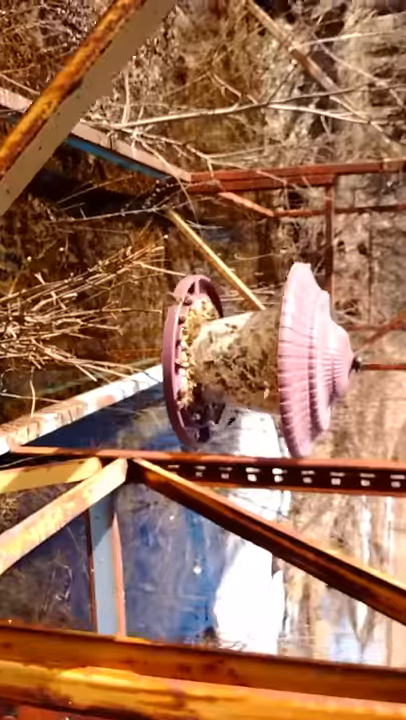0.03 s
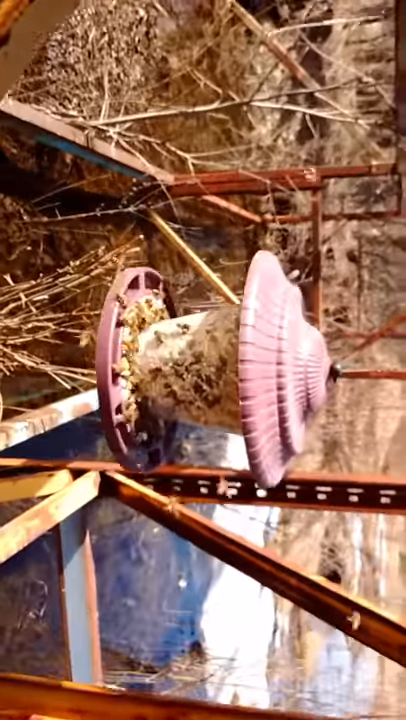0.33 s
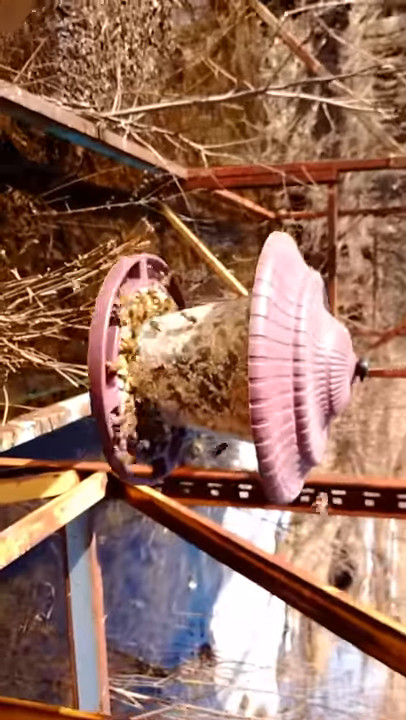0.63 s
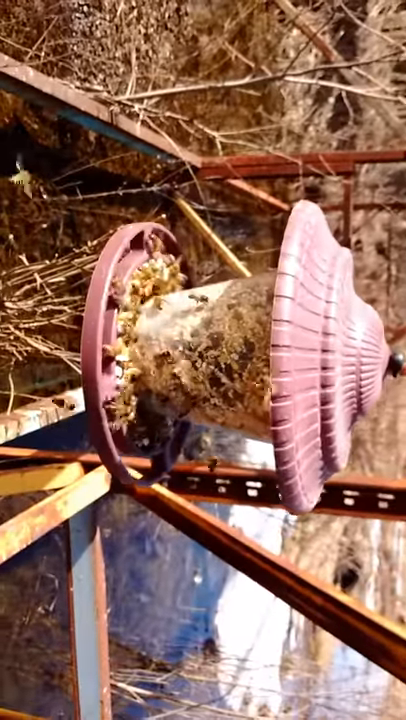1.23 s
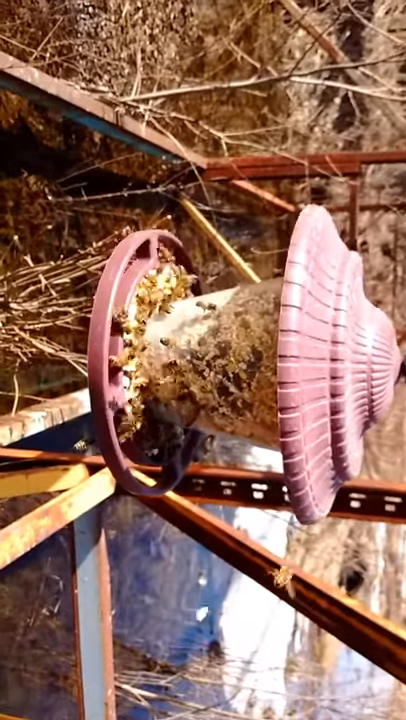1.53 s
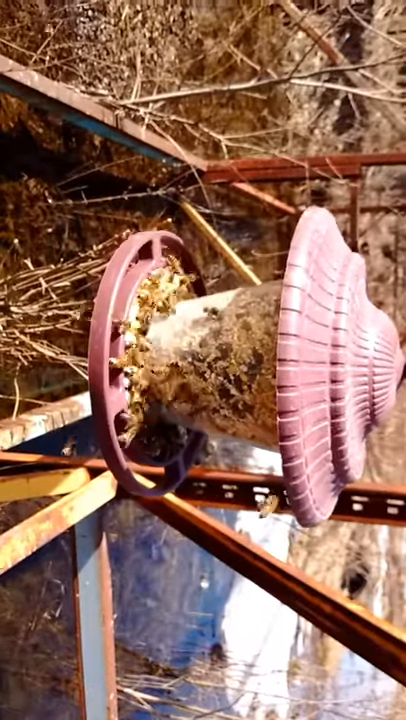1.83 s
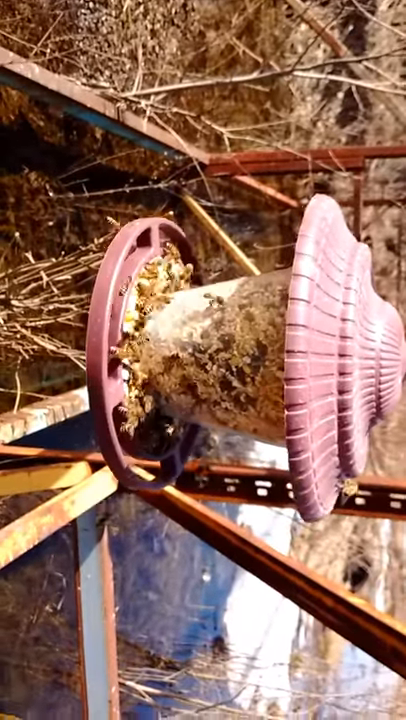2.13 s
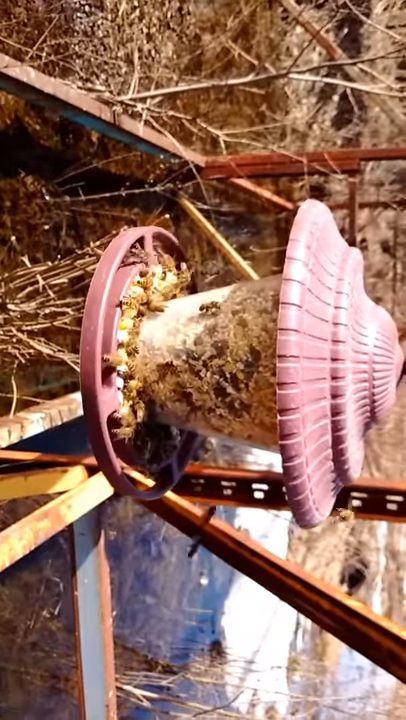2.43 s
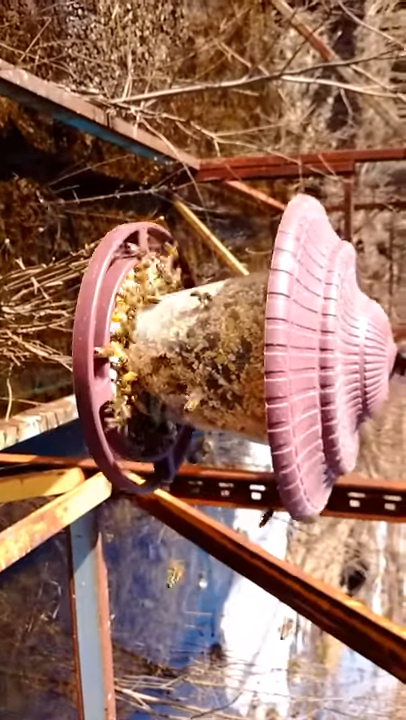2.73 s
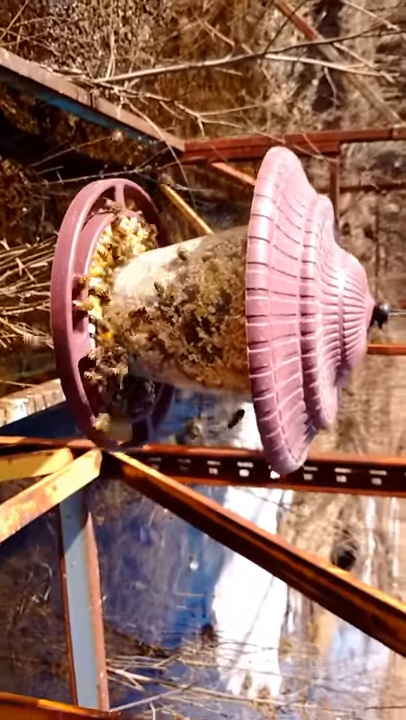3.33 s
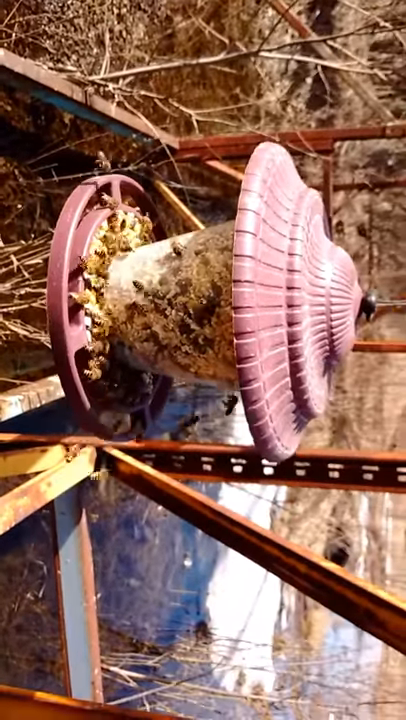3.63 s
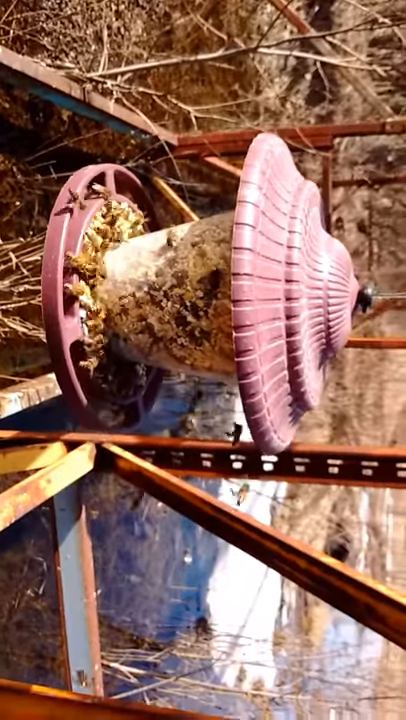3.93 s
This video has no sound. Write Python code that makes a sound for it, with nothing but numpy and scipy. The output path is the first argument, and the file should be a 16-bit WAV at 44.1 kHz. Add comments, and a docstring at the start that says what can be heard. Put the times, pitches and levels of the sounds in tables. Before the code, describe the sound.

A swarm of bees hums steadily in hissing outdoor air, and several fly right by the microphone. Handling adds short rustles and a few sharp clicks, the loudest briefly turning the buzzing down.

```python
"""Honeybees swarm round a hanging feeder outdoors, their wingbeats buzzing over a steady hiss. Five of them fly
close past the microphone. Handling makes soft rustles, bees strike the recorder in sharp ticks that ring its
casing, and puffs of air bump the microphone openings. After each loud tick the recorder's gain control turns
everything down, then creeps back up. The stereo is very wide: in the bass, left and right move nearly opposite
ways."""
import sys
import numpy as np
from scipy import signal
from scipy.fft import rfft, irfft, next_fast_len
from scipy.io import wavfile

SR = 44100
rng = np.random.default_rng(int(sys.argv[2]) if len(sys.argv) > 2 else 0)


def transcribe(u):
    """Save the signal u as a 16-bit wav file named by the first command-line argument.

    u: samples, shape (n,) or (channels, n), limited to [-1, 1]; the rate is SR.
    q: integer samples, one column per channel.
    """
    v = np.clip(np.atleast_2d(u).T, -1, 1)
    q = np.round(v * 32767).astype(np.int16)
    wavfile.write(sys.argv[1], SR, q)


N = 176400
TIME = np.arange(N) / SR
WINGBEAT_HZ, FLUTTER_PER_S = 236.84, 25
RUSTLE_ATTACK_S = 0.0009

# A "pair" is two signals: mid (what left and right share) and side (how they differ).
# how strongly the microphones pick up the mid and the side: f/Hz, gain/dB
MID_RESPONSE = [(100, -13), (480, -11), (720, -8.5), (1200, 1), (1600, 3.5), (2200, -3.5), (3200, -13),
                (4000, -6.5), (4800, -3.5), (5700, -6.5), (6400, -28), (7000, -5.5), (7800, -1), (9500, -7),
                (12000, 3.5), (14000, -8), (15300, -3)]
SIDE_RESPONSE = [(100, 10.5), (480, 7), (720, 2.5), (1200, -0.5), (1550, -8.5), (2000, -4.5), (2800, 3),
                 (3400, -3), (4000, -2), (4700, -33), (5500, -1.5), (6800, -9.5), (8000, -4), (9500, -11),
                 (11000, 7), (12500, -18), (14200, 5), (15300, -29)]
# tone of the grainy noise in rustles and tick tails: f/Hz, level/dB
GRAIN_SPECTRUM = [(200, -16), (600, -3), (1200, -9.5), (2500, 5), (5000, 0), (7500, 6), (11000, -3.5),
                  (15000, -4)]


def from_db(db):
    """Turn decibels into a factor to multiply by."""
    return 10 ** (np.asarray(db) / 20)


def unit_power(x):
    """Scale a signal so that its average power is 1."""
    return x / np.sqrt(np.mean(x ** 2) + 1e-20)


def db_at(spectrum, hz):
    """Read a level between the points of a spectrum, with octaves evenly spaced."""
    f, db = np.transpose(spectrum)
    return np.interp(np.log(np.maximum(hz, 1)), np.log(f), db)


def colour(x, spectrum, share=1):
    """Filter a sound to follow a spectrum; share scales the spectrum's decibels."""
    size = 2 * next_fast_len(N // 2 + SR // 10)
    hz = np.arange(size // 2 + 1) * SR / size
    cepstrum = irfft(np.log(from_db(share * db_at(spectrum, hz))))
    # minimum phase: the filter rings after a sound, never before it
    cepstrum[1:size // 2] *= 2
    cepstrum[size // 2 + 1:] = 0
    return irfft(rfft(x, size) * np.exp(rfft(cepstrum)))[..., :N]


def drift(per_s):
    """A smooth random wobble of typical size 1; a higher rate makes it quicker."""
    step, run_in = 20, 4000
    pole = np.exp(-2 * np.pi * step * per_s / SR)
    noise = rng.standard_normal(N // step + run_in + 2)
    slow = signal.lfilter([1], [1, -2 * pole, pole * pole], noise)[run_in:]
    return np.interp(np.arange(N) / step, np.arange(len(slow)), unit_power(slow))


def strike(start_s, attack_s, t60):
    """A loudness curve that rises quickly, then fades by 60 dB in t60 seconds."""
    age = np.maximum(TIME - start_s, 0)
    return (1 - np.exp(-age / attack_s)) * np.exp(-np.minimum(np.log(1000) * age / t60, 40))


def early_echoes(pair, count=10, longest_s=.006, echo_db=-13.5):
    """Quick echoes from nearby surfaces make a sound ring slightly."""
    out = pair.copy()
    for channel in (0, 1):
        for lag in rng.uniform(0, longest_s, count):
            out[channel] += rng.choice([-1, 1]) * from_db(echo_db) * np.roll(pair[channel], int(lag * SR))
    return out


def microphones(pair):
    """The microphones give the mid and the side each their own tone."""
    return np.array([colour(pair[0], MID_RESPONSE), colour(pair[1], SIDE_RESPONSE)])


def left_right(pair):
    """Turn mid and side into left and right."""
    return np.array([pair[0] + pair[1], pair[0] - pair[1]])


def swarm(bees=14, harmonics=40, spread_hz=7, wander_hz=11.5, flutter_hz=2.2, swell_db=7.5):
    """Each bee repeats its own wing stroke at a wandering pitch, swelling and fading as it circles."""
    # loudness of the whole swarm: t/s, level/dB
    loudness = [(0, -39), (.5, -41.5), (.95, -41), (1.3, -38), (1.9, -38.5), (2.35, -37.5), (2.85, -39),
                (3.3, -39), (3.58, -37.5), (3.75, -37), (4, -42.5)]
    # strength of the harmonics (whole multiples of the wingbeat): f/Hz, level/dB
    buzz_spectrum = [(237, 0.5), (474, 1.95), (711, -1), (950, -5), (1190, -4), (1450, -7.5), (2000, -13.5),
                     (3000, -11), (5000, -16.5), (9000, -13.5)]
    out = np.zeros((2, N))
    strengths = from_db(db_at(buzz_spectrum, np.arange(1, harmonics + 1) * WINGBEAT_HZ))
    for offset in np.linspace(-1, 1, bees) * np.sqrt(3):
        hz = WINGBEAT_HZ + spread_hz * offset + wander_hz * drift(4) + flutter_hz * drift(FLUTTER_PER_S)
        partials = strengths * np.exp(2j * np.pi * rng.random((2, harmonics)))
        stroke = irfft(np.pad(partials, ((0, 0), (1, 0))), 8192)  # the wave of one wingbeat
        place_in_stroke = (np.cumsum(hz) / SR % 1 * stroke.shape[1]).astype(int)
        swell = from_db(swell_db * np.minimum(drift(5.5), 1.5))
        out += stroke[:, place_in_stroke] * swell
    return unit_power(out) * from_db(np.interp(TIME, *np.transpose(loudness)))


def hiss(level_db=-41, rumble_edge_hz=70, sway_db=-0.5):
    """Smooth outdoor hiss over a rumble that sways with the breeze."""
    # tone of the outdoor air: f/Hz, level/dB
    air_spectrum = [(25, -6.5), (60, 1.5), (140, 4), (330, -4.5), (600, -5), (1200, -9), (2000, -4),
                    (4000, -8), (8000, -13), (12000, -20), (15500, -16.5)]
    noise = unit_power(colour(rng.standard_normal((2, N)), air_spectrum))
    rumble = signal.sosfiltfilt(signal.butter(2, rumble_edge_hz, fs=SR, output="sos"), noise)
    sway = from_db(sway_db * drift(3.4))
    return from_db(level_db) * (noise + rumble * (sway - 1))


def rustles(grain_db=2.5, grains_per_s=300):
    """Handling makes short, grainy bursts of bright noise."""
    # each rustle: t/s, level/dB, fade time t60/s
    bursts = [(0.135, -33.5, .12), (.8135, -40.5, 0.21), (1.369, -34.5, 0.078), (1.532, -23.5, 0.11),
              (2.3172, -17.5, 0.12), (2.5432, -27, 0.16), (2.6665, -31.5, 0.11), (3.392, -32, 0.09)]
    envelope = sum(from_db(db) * strike(s, RUSTLE_ATTACK_S, t60) for s, db, t60 in bursts)
    noise = colour(rng.standard_normal((2, N)), GRAIN_SPECTRUM)
    grains = noise * from_db(grain_db * drift(grains_per_s))
    return envelope * unit_power(early_echoes(grains))


def puffs(mid_db=-6, side_db=2):
    """Air bumps the microphone openings: low thumps that push left and right opposite ways."""
    # each puff: middle t/s, level/dB, half length/s, upper edge f/Hz
    bumps = [(0.5, -48, 0.1, 140), (0.613, -25.5, 0.014, 187), (0.654, -45, 0.059, 104),
             (0.857, -42, 0.053, 88), (1.441, -26, 0.01, 160), (2.605, -38.5, 0.015, 55)]
    out = np.zeros(N)
    for s, db, half_s, edge_hz in bumps:
        band = signal.butter(4, [edge_hz / 3, edge_hz], "band", fs=SR, output="sos")
        window = np.exp(-((TIME - s) / half_s) ** 2)
        thump = signal.sosfilt(band, rng.standard_normal(N)) * window
        out += from_db(db) * thump * np.sqrt(np.sum(window ** 2) / np.sum(thump ** 2))
    return out * from_db([[mid_db], [side_db]])


def ticks(attack_s=0.00022, knock_t60=0.016, tail_db=-20, tail_t60=.05, size=2048):
    """Each tap rings the casing, tuned a little by where it lands, with a knock and a faint noisy tail."""
    # each tap: t/s, level/dB, brightness/(dB per octave), ring time factor, pitch factor,
    # knock level/dB relative to the tap, knock f/Hz
    taps = [(0.989, -0.18, 3.5, 1.1, 1.037, -17, 2380), (1.08, -19.5, 12, 1.5, 1.2, 1, 2650),
            (1.4964, -5, 11.5, 2, 1, -8, 3720), (1.5063, -7.5, 13, 1.6, 1.1, -3, 2375),
            (1.6828, -16, 6, 1.6, 1.06, 3, 3150), (3.625, 3, 1, 1, 1.033, -31, 2960),
            (3.8517, -9, 11, 1.3, 1.04, 2, 3070)]
    # the tones the casing rings with: f/Hz, mid level/dB, side level/dB, fade time t60/s
    casing_tones = [(1930, -5, -8, 0.0051), (3270, -51, 3, 0.0047), (4610, 10, -4, 0.002),
                    (7290, -8, 0, 0.0041), (7890, 9.5, -16, 0.0015), (9460, -6.5, -2.5, 0.0039),
                    (10680, -9, -7, 0.003), (14800, -16, -32, 0.0014)]
    out = np.zeros((2, N + size))
    age = np.arange(size) / SR
    hz, mid_db, side_db, t60 = np.transpose(casing_tones)
    strengths = np.array([from_db(mid_db), (-1) ** np.arange(len(hz)) * from_db(side_db)])
    rise = 1 - np.exp(-age / attack_s)
    for s, db, brightness, stretch, tuning, knock_db, knock_hz in taps:
        fades = from_db(-60 * age / (stretch * t60[:, None]))
        tones = np.sin(2 * np.pi * tuning * hz[:, None] * age) * fades
        ring = (strengths * from_db(brightness * np.log2(hz))) @ tones * rise
        ring /= np.abs(ring).sum(0).max()
        knock = np.sin(2 * np.pi * knock_hz * age + [[0], [np.pi / 2]])
        knock *= rise * from_db(-60 * age / knock_t60) / 2
        knock[0] *= from_db(db_at(MID_RESPONSE, knock_hz) - db_at(SIDE_RESPONSE, knock_hz))
        start = int(s * SR)
        out[:, start:start + size] += from_db(db) * (ring + from_db(knock_db) * knock)
    tails = sum(from_db(db + tail_db) * strike(s, attack_s, tail_t60) for s, db, *_ in taps)
    noise = unit_power(colour(rng.standard_normal((2, N)), GRAIN_SPECTRUM))
    return out[:, :N] + tails * microphones(noise)


def close_bees(harmonics=24):
    """Single bees pass the microphone; each buzz glides, flickers and changes tone as the bee turns."""
    # one path per bee, with points of: t/s, wingbeat f/Hz, level/dB, brightness/(dB per octave)
    paths = [
        [(1.23, 243, -46, -4), (1.295, 244, -25, -4), (1.36, 236, -25, -1), (1.41, 236, -26.5, 1),
         (1.455, 238, -30, 2.5), (1.515, 245, -39, 7), (1.6, 244, -56, 2)],
        [(1.82, 244, -56, -1), (1.88, 240, -39, 0), (1.93, 235, -35.5, -2), (1.98, 231, -50, -2)],
        [(1.93, 234, -48, -5), (1.985, 230, -28.5, -3), (2.05, 242, -29.5, 1.5), (2.13, 236, -50, 2)],
        [(2.66, 240, -50, 1), (2.77, 244, -37, 1), (2.845, 246, -29.5, .5), (2.92, 239, -32, -1),
         (3.0, 236, -50, -3)],
        [(3.4, 238, -48, 0), (3.48, 235, -32.5, 0), (3.57, 225, -30.5, 0), (3.62, 220, -36, 0),
         (3.7, 220, -58, 0)],
    ]
    # how each bee flies: side level/dB relative to mid, pitch flutter/Hz, level flicker/dB
    flights = [(-8, 1.5, .8), (1, 3, 1), (-12, 2, 1), (-6, 1.2, .8), (-3, 3, 2.6)]
    # each bee's own buzz: level/dB of harmonics 1 to 6
    low_harmonics = [(1, 4.5, -7.5, -15, -14.5, -26), (-5, 3, -4, -19, -18, -22),
                     (-1.5, 2, -8, -19, -14.5, -30), (-8, 6.5, -6, -10, -7, -20),
                     (2, 0, -11, -8.5, -26, -20.5)]
    # the higher harmonics, alike for all close bees: f/Hz, level/dB
    treble = [(1650, -26.5), (2000, -19), (4000, -25), (9000, -68)]
    out = np.zeros((2, N))
    k = np.arange(1, harmonics + 1)[:, None]
    for path, (side_db, flutter_hz, flicker_db), low_db in zip(paths, flights, low_harmonics):
        times, *columns = np.transpose(path)
        near = (TIME > times[0]) & (TIME < times[-1])
        hz, db, brightness = (np.interp(TIME[near], times, column) for column in columns)
        phase = 2 * np.pi * np.cumsum(hz + flutter_hz * drift(FLUTTER_PER_S)[near]) / SR
        harmonics_db = np.append(low_db, db_at(treble, k[len(low_db):] * WINGBEAT_HZ))[:, None]
        strengths = from_db(harmonics_db + brightness * np.log2(np.minimum(k, 6)))
        loudness = from_db(db + flicker_db * drift(FLUTTER_PER_S)[near])
        strengths *= loudness / np.sqrt((strengths ** 2).sum(0) / 2)
        start_phases = 2 * np.pi * rng.random((harmonics, 1))
        buzz = (strengths * np.exp(1j * (k * phase + start_phases))).sum(0)
        out[:, near] += [buzz.real, from_db(side_db) * buzz.imag]  # side lags a quarter cycle
    return out


def ping(start_s=2.319, hz=4845, level_db=-27.5, t60=.045):
    """A short, thin ring in the centre, under the loudest rustle."""
    return from_db(level_db) * strike(start_s, RUSTLE_ATTACK_S, t60) * np.sin(2 * np.pi * hz * TIME)


def scene():
    """Bees, hiss and rustles come through the air; ticks and puffs hit the recorder itself."""
    # how much more the left is boosted than the right: f/Hz, difference/dB
    balance = [(100, 1), (1300, 2), (2000, 4.5), (3700, 0.5), (5200, 2), (7800, -3.5), (10500, -3),
               (14000, 2.5)]
    left, right = left_right(microphones(swarm() + close_bees() + hiss() + rustles()))
    air = np.array([colour(left, balance, share=0.22), colour(right, balance, share=-0.78)])
    return air + ping() + left_right(ticks() + puffs())


def record(dry):
    """Loud peaks pull the gain down and it creeps back; overloads clip; the highest treble is cut."""
    # how far the gain control turns the sound down: peak level/dB, gain cut/dB
    cut_for_peak = [(-14, 0.5), (-5, 9), (0, 11.5), (2.5, 18.5)]
    start_cut_db, attack_s, recovery_db_per_s, cutoff_hz = 5.5, 0.0046, 10.5, 15700
    peak_db = 20 * np.log10(np.abs(dry).max(0) + 1e-9)
    wanted_db = np.interp(peak_db, *np.transpose(cut_for_peak))
    wanted_db[0] = start_cut_db
    recovery_db = recovery_db_per_s * TIME
    held_db = np.maximum.accumulate(wanted_db + recovery_db) - recovery_db  # each cut wears off steadily
    pole = np.exp(-1 / (attack_s * SR))
    cut_db = signal.lfilter([1 - pole], [1, -pole], held_db - start_cut_db) + start_cut_db
    low_pass = signal.ellip(10, .2, 70, cutoff_hz, fs=SR, output="sos")
    return signal.sosfilt(low_pass, np.clip(dry * from_db(-cut_db), -1, 1))


dry = scene()
out = record(dry)
transcribe(out)
```